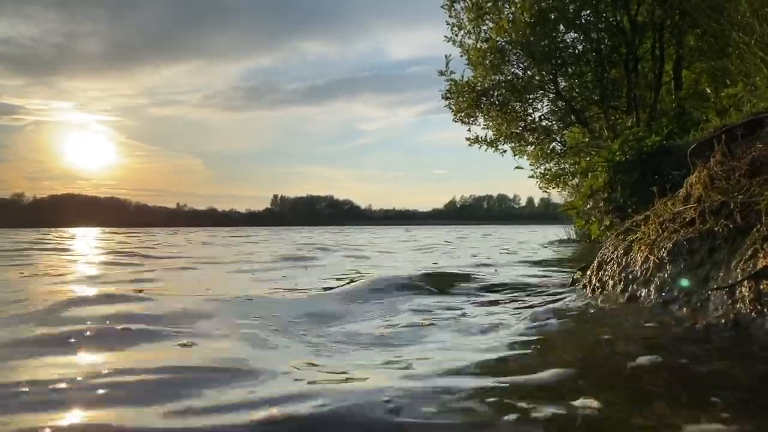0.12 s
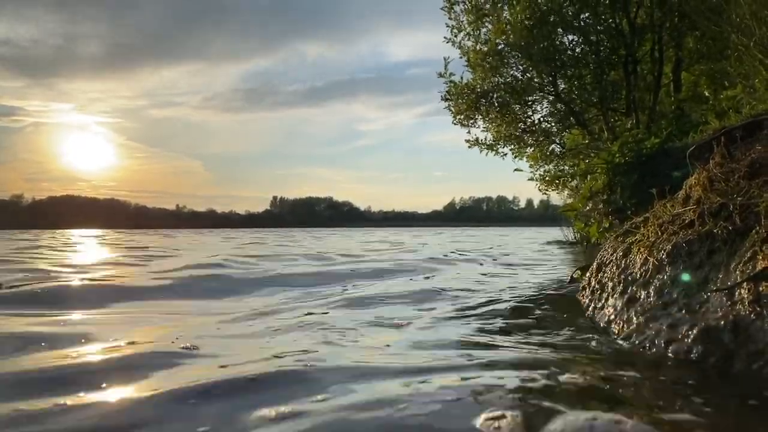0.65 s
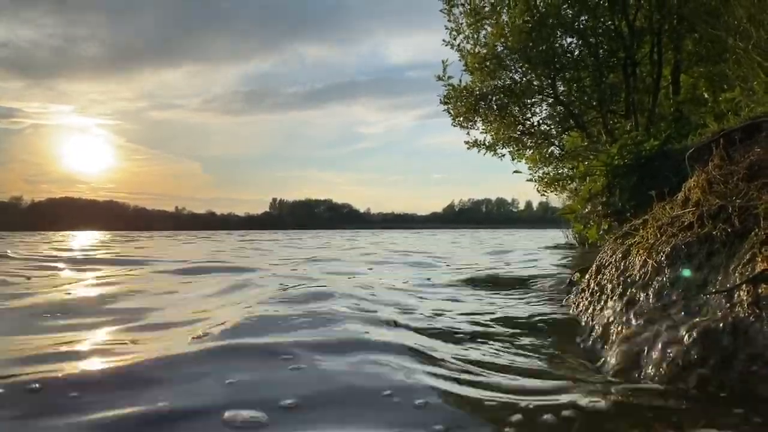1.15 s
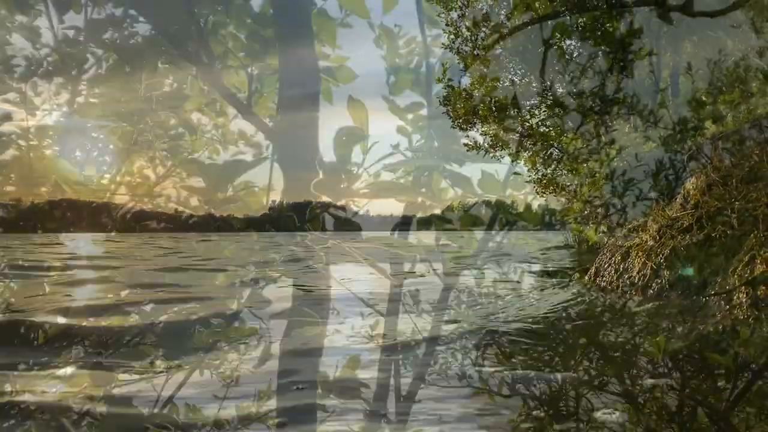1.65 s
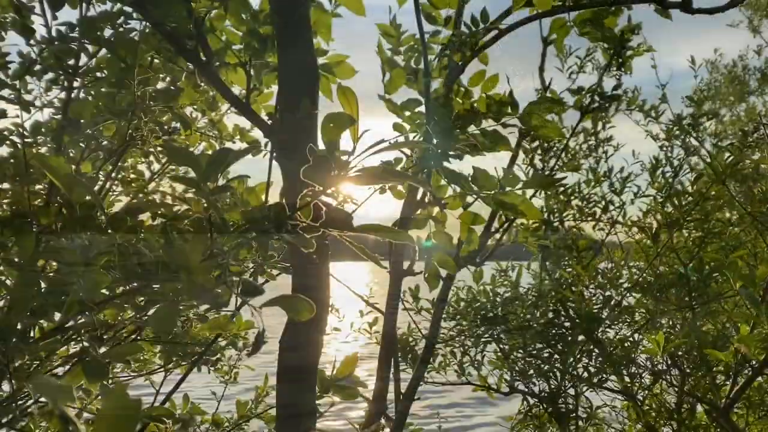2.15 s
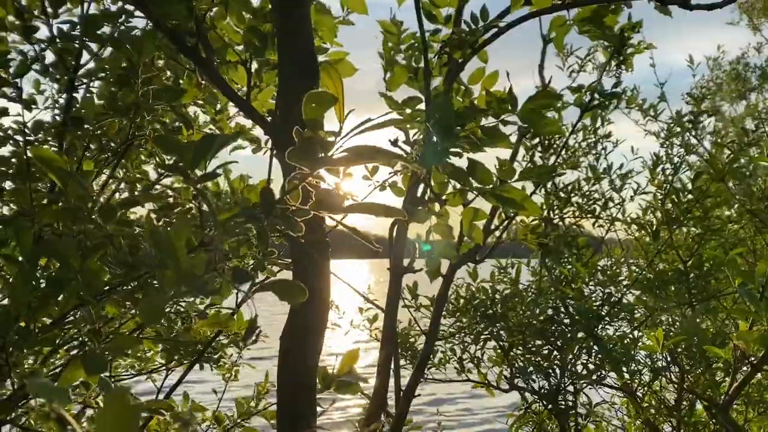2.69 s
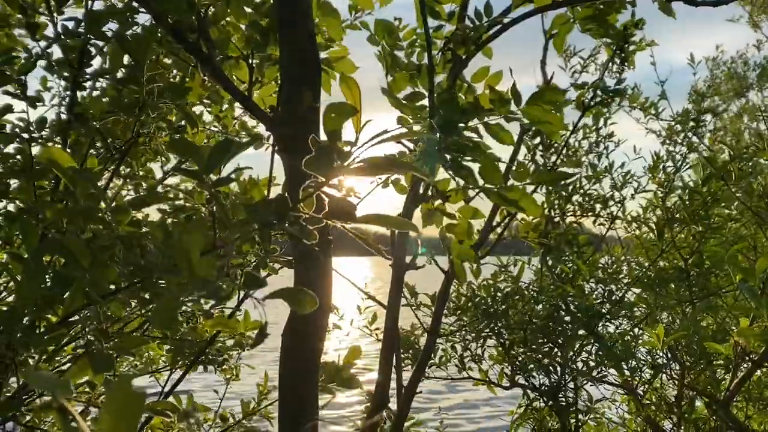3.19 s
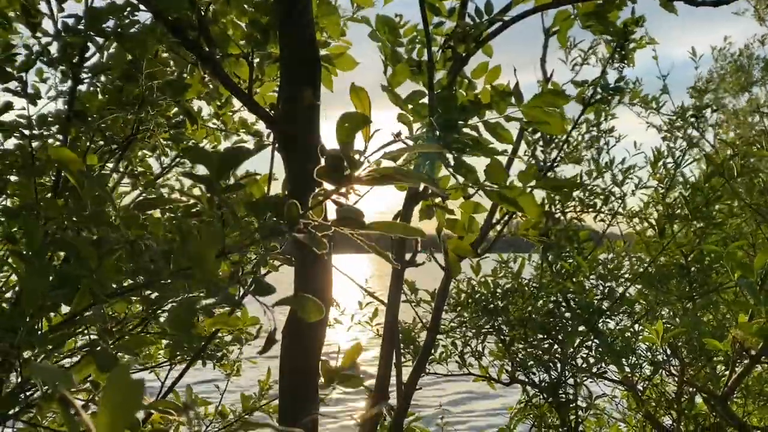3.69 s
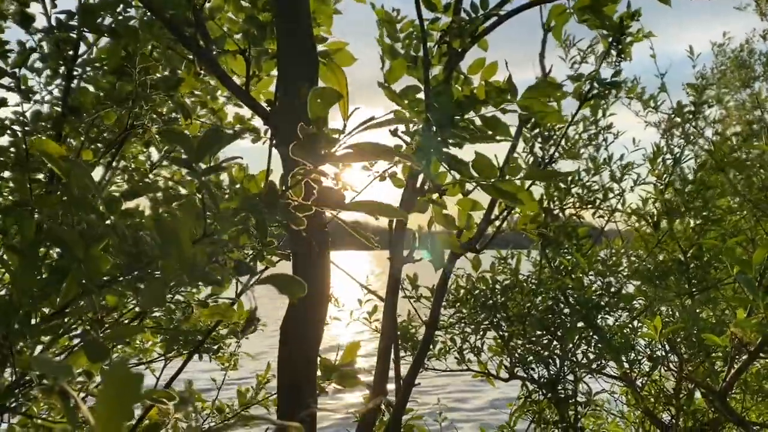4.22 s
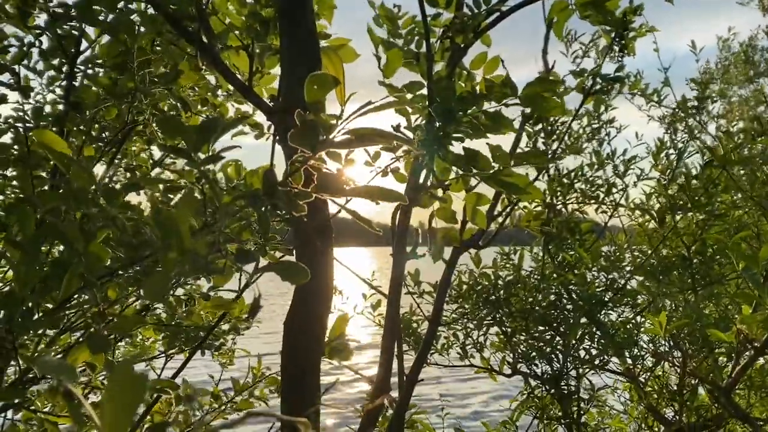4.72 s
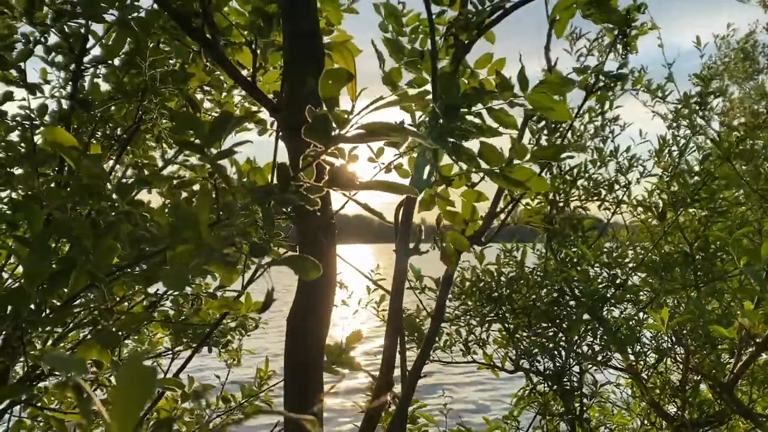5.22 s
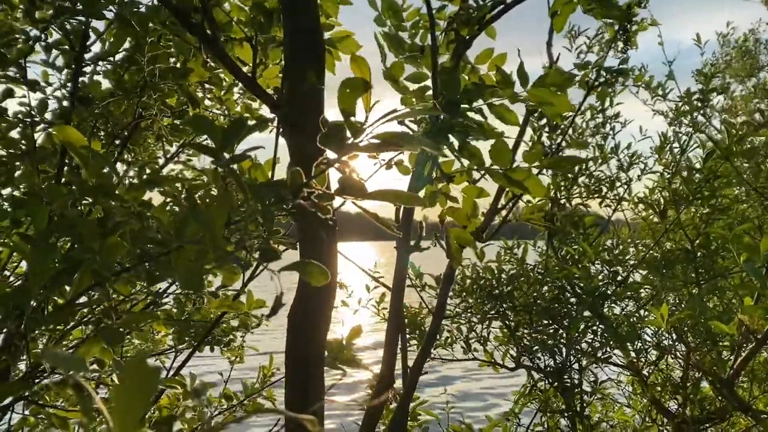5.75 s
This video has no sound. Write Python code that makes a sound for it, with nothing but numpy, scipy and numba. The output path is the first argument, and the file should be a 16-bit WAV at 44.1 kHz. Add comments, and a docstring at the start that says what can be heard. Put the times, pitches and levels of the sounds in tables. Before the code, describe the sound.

A stereo phone near the waterline catches wet slaps, bubbly gurgles and bright, snapping droplets for under two seconds, thinning to drips. Uneven wind rumble lies beneath. A smooth crossfade leads to hushed lakeside trees: low scooped whistles, a cluster of quick high chirps, then sparse distant chips, left of centre with slight woodland echo. Soft leaf hiss and isolated twig clicks remain.

```python
"""Small waves slap a muddy lake bank close to a two-port phone microphone: bubbles ring as damped
sines, while spray and foam crackle as swarms of much shorter ones.
The place then dissolves into a spot among trees above the water, where birds, as gliding sines with
a noise echo, whistle to the left and twigs tick. Shaped noise gives wind rumble, far roar and leaf hiss."""
import sys
import numpy as np
from scipy import signal
from scipy.fft import rfft, irfft, next_fast_len
from scipy.io import wavfile
from scipy.ndimage import uniform_filter1d
from numba import njit

SR = 44100
rng = np.random.default_rng(int(sys.argv[2]) if len(sys.argv) > 2 else 0)


def dump(signal):
    """Clip the signal to [-1, 1] and save it as 16-bit WAV at the path in sys.argv[1]."""
    limited = np.clip(np.atleast_2d(signal).T, -1, 1)
    pcm = np.round(limited * 32767).astype(np.int16)
    wavfile.write(sys.argv[1], SR, pcm)


def amplitude_ratio(level_db):
    """Convert a level in decibels to the matching linear amplitude (field) ratio."""
    exponent = np.asarray(level_db, float) / 20
    return 10 ** exponent


N = 258867

TRICKLE_DB, FOAM_ENDS_S = -68.5, 2.1  # water draining between the slaps; end of all foam


def over_hz(hz, table):
    """Interpolation on a logarithmic frequency axis, from a table of Hz and value."""
    f, v = np.transpose(table)
    return np.interp(np.log(hz + 1), np.log(f + 1), v)


def over_s(s, values):
    """Linear interpolation in time, one value a sample."""
    return np.interp(np.arange(N) / SR, s, values)


def walk(rate):
    """Low-passed random process: levels held 1 / rate s and slewed twice; spread near 1."""
    hold = int(SR / rate)
    held = np.repeat(rng.standard_normal(N // hold + 1), hold)
    return 1.047 * uniform_filter1d(uniform_filter1d(held, hold), hold)[:N]


def ears(pan_db):
    """Interaural level difference: left and right gains for left minus right dB."""
    return amplitude_ratio(np.array([pan_db, -pan_db]) / 2)


def resonate(x, hz, width_hz):
    """Two-pole resonance, gain 1 at the centre."""
    return signal.lfilter(*signal.iirpeak(hz, hz / width_hz, SR), x)


def band_hz(size):
    """Frequency in Hz of each bin of a real Fourier transform."""
    return np.arange(size // 2 + 1) * SR / size


def air(place, flicker_db):
    """Turbulent noise as rumble, roar and hiss, each of rms 1: gusts swell all bands, each flickers alone."""
    colour, _, alike, balance = place
    hiss_flicker_db = 1.2  # the hiss stays smoother than the rumble
    size = next_fast_len(N)
    hz = band_hz(size)
    likeness = np.clip(over_hz(hz, alike), -.96, .96)
    mid, side = rfft(rng.standard_normal((2, size)))
    pair = np.sqrt(1 + likeness) * mid + np.sqrt(1 - likeness) * side * np.array([[1], [-1]])
    pair = pair * ears(over_hz(hz, balance)) * amplitude_ratio(over_hz(hz, colour))
    layers, gust = np.zeros((3, 2, N)), walk(16)
    for centre in 2. ** np.arange(4, 15):  # octave bands, 16 Hz to 16 kHz
        share = np.cos(np.pi / 2 * np.clip(np.log2((hz + 1) / centre), -1, 1)) ** 2
        if centre < 400:
            swell_db = flicker_db * walk(10) + 2.2 * gust
        else:
            swell_db = hiss_flicker_db * walk(10) + .3 * gust
        layer = int(centre > 140) + int(centre > 400)
        layers[layer] += irfft(pair * share, size)[:, :N] * amplitude_ratio(swell_db)
    rms = np.sqrt(np.mean(layers.mean(axis=1) ** 2, axis=1))  # of the mean of left and right
    return layers / rms[:, None, None]


@njit
def rings(n, start, turn, decay, rise, left, right):
    """Damped free oscillation: sines whose pitch climbs as they die (rise: share per neper of decay)."""
    out = np.zeros((2, n))
    for k in range(len(start)):
        z, w = -1j, turn[k]
        for i in range(start[k], min(n, start[k] + int(7 / decay[k]))):
            z *= np.exp(1j * w - decay[k])
            w *= 1 + rise * decay[k]
            out[0, i] += left[k] * z.real
            out[1, i] += right[k] * z.real
    return out


def pops(rows, rise, crack_db):
    """Bubble resonance: each row rings at its pitch; the break of the surface adds a sharp crack."""
    s, db, hz, t60_ms, pan_db = np.transpose(rows)
    start = np.clip(s * SR, 0, N - 1).astype(np.int64)
    gains = amplitude_ratio(db) * ears(pan_db)
    turn = 2 * np.pi * hz / SR  # radians a sample
    decay = np.log(1000) * 1000 / (t60_ms * SR)  # nepers a sample
    out = rings(N, start, turn, decay, rise, *gains)
    crack = np.zeros((2, N))
    np.add.at(crack, (slice(None), start), gains * amplitude_ratio(crack_db))
    # a crack has no body
    crack = signal.sosfilt(signal.butter(2, 3000, "high", fs=SR, output="sos"), crack)
    return out + crack + resonate(crack, 10400, 2500)  # each crack rings the port resonance


def churn_db(t, trickle_db):
    """Energy growth and decay of foam: each slap swells, churns on and dies; between them the bank drains."""
    # Waves slapping the mud. Each row: time in seconds, foam level in dB, churning on in seconds.
    slap_rows = [(0.154, -44, 0.0097), (.262, -60.5, 0.011), (.39, -63, 0.012), (.55, -56.5, 0.097),
                 (.712, -53.5, 0.01), (.78, -49.5, 0.085), (1.525, -58.5, 0.033), (1.84, -68, 0.033)]
    rise_db_per_s, fall_db_per_s = 302.5, 280
    trickle_ends_s = 1.35
    s, db, hold = np.transpose(slap_rows)[:, :, None]
    before, after = np.maximum(s - t, 0), np.maximum(t - s - hold, 0)
    slaps = db - rise_db_per_s * before - fall_db_per_s * after
    trickle = trickle_db - 40 * np.clip((t - trickle_ends_s) / 0.053, 0, .3)  # sinks by 12 dB
    return np.maximum(slaps.max(axis=0), trickle)


def foam(count=2400):
    """Random superposition of tiny bubbles, a few much louder than the rest, following the churning."""
    when, pitch, size, ring, side = rng.random((count, 5)).T
    s, hz = when * FOAM_ENDS_S, 1100 * (12000 / 1100) ** pitch
    db = churn_db(s, TRICKLE_DB) + 3 - 4.4 * np.log(size + .015) - 1.882 * np.log2(hz / 2000)
    cycles = 4 + 18 * ring ** 2 * (1 - pitch)  # the larger ones plop, the smallest only tick
    return pops(np.transpose([s, db, hz, 1000 * cycles / hz, 9 * (side - .5)]), 0.031, -16.5)


def gurgle(count=700):
    """Resonance of larger bubbles, which ring longer and climb in pitch as they near the surface."""
    when, pitch, size, ring, side = rng.random((count, 5)).T
    s, hz = when * FOAM_ENDS_S, 800 * 4.5 ** pitch
    db = churn_db(s, TRICKLE_DB - 4) - 3 * np.log(size + 0.0299)
    cycles = 10 + 25 * ring
    return pops(np.transpose([s, db, hz, 1000 * cycles / hz, 12 * (side - .5)]), 0.073, -19.5)


def spray(count=9):
    """Clustered impulses: each burst is droplets scattered in time and pitch, loudest in the middle."""
    # The clearest bursts. Each row: time in seconds, level in dB ahead of the scatter in level,
    # middle pitch in Hz, left minus right in dB.
    bursts = [(.0192, -32, 4320, 0), (.1, -37.5, 7600, 1.3), (.112, -37, 8460, 8), (.13, -33.5, 10930, -1),
              (.1346, -26, 3750, -4), (.1566, -29, 5600, 1), (.1656, -38, 5550, 13), (.221, -34, 3500, -3),
              (.2564, -27, 10500, -2), (.2653, -32, 5740, 11), (.3209, -39, 6180, 9.5),
              (.376, -49, 2900, 7), (.3963, -35, 4360, 7), (.423, -60, 4700, 5), (.437, -60, 3100, 5),
              (.5502, -38, 4180, 13), (.574, -30.5, 11600, -1), (.5934, -44, 8650, 7),
              (.635, -31.5, 4350, 1), (.6858, -41, 3720, 7), (.6976, -62, 5800, 6), (.7151, -22, 11500, 0),
              (.7264, -28, 11800, 1), (.7722, -35, 7850, 6), (.79, -30, 4380, -4), (.7955, -4, 10400, 0),
              (.8284, -30, 10590, 4), (.8522, -31.5, 4180, 3), (.8564, -30.5, 6600, -5),
              (.884, -39, 4120, 4), (.958, -37.5, 5240, 17), (1.0352, -50, 6320, -4),
              (1.0537, -46.5, 6770, 12), (1.0728, -39.5, 5010, 6), (1.154, -50, 11050, -2.5),
              (1.4193, -49, 11900, 0), (1.5158, -44, 4690, 6), (1.5284, -36.5, 8400, -11.5),
              (1.5315, -24.5, 10060, 3), (1.5705, -39, 9340, 1), (1.6396, -48, 10340, -3),
              (1.717, -36.5, 13850, 2.5), (1.8156, -49.5, 9690, -7), (1.8251, -47.5, 8350, 6.5),
              (1.8804, -44.5, 9370, 1)]
    s, db, hz, pan_db = np.repeat(bursts, count, axis=0).T
    early, detune, size = rng.standard_normal((len(s), 3)).T
    early[::count], detune[::count], size[::count] = 0, 0, 2  # the main droplet of each burst
    spread_s = .21 * (55 / hz + 0.0047)  # scatter in time: about 11.5 cycles of the pitch plus about 1 ms
    hz = np.clip(hz * 1.33 ** detune, 1800, 14000)
    db = db - 9.5 + 3 * size - 4 * abs(early) - 4 * np.maximum(early, 0) + 4.3 * np.log2(hz / 5000)
    return pops(np.transpose([s + early * spread_s, db, hz, 46000 / hz, pan_db]), 0, -15)


def bubbles():
    """Free resonance of single bubbles at the bank, their pitch climbing only slightly."""
    # The clearest bubbles. Each row: time in seconds, level in dB, pitch in Hz,
    # ring t60 in milliseconds, left minus right in dB.
    bubble_rows = [(.0503, -37.5, 710, 14, -9.5), (.1001, -45, 2194, 23, 2), (.1343, -30, 1800, 6.6, -11),
                   (.1433, -40, 2000, 14, 3), (.1544, -45, 1130, 14, -8), (.1605, -39, 1080, 7.6, -9.5),
                   (.1659, -20.5, 1056, 28, -12), (.193, -48, 1810, 22, -5), (.2048, -50, 1750, 18, -3),
                   (.2205, -32, 2600, 20, -3), (.2234, -29, 1030, 17, -4), (.2262, -26, 793, 70, -7),
                   (.262, -41.5, 1250, 18, -6), (.518, -32.5, 1060, 24, 2.5), (.828, -30.5, 1180, 12, 2),
                   (.2644, -35, 3830, 12, -5), (.3926, -32.5, 885, 40, 5.5), (.4695, -49.5, 1670, 17, 13),
                   (.5176, -36.5, 1760, 13, 5), (.5502, -34, 3150, 12, 8), (.5724, -40.5, 1420, 29, 16.5),
                   (.6032, -35.5, 1840, 13, -9), (.6259, -32, 1600, 15, 12), (.698, -25.5, 950, 17, 9.5),
                   (.7136, -29, 1400, 25, -6.5), (.7136, -30.5, 2030, 15, -4.5), (.717, -33, 3400, 18, 7),
                   (.7238, -36, 2540, 11, 1), (.7587, -37, 2470, 13, 0), (.7683, -31.5, 3020, 14, -3),
                   (.7675, -31.5, 1810, 11, -4.5), (.7944, -25.5, 1650, 9, -0.9),
                   (.803, -32, 1000, 28, -12.5), (.789, -33.5, 1750, 9, -1), (.851, -35.5, 2580, 12, -2),
                   (.8428, -31.5, 1940, 8, -2), (.8508, -30.5, 1760, 14, -2.5),
                   (.8626, -32.5, 1097, 15, -9), (.8841, -39, 1080, 13, -5), (.8959, -35, 836, 15, -4.5),
                   (.9581, -41, 3290, 16, -9), (1.1348, -52.5, 1310, 30, 14), (1.1921, -46.5, 1270, 21, -8),
                   (1.177, -52.5, 1960, 15, 0), (1.226, -50, 1320, 35, 5), (1.243, -55.5, 1880, 20, -8),
                   (1.571, -35.5, 1367, 16, -8.5), (1.5106, -54, 1000, 15, 5.5), (1.5165, -46, 2590, 14, 8),
                   (1.5712, -41.5, 2870, 18, -7)]
    return pops(bubble_rows, 0.01198, -0.98)


def fizz(count=900):
    """Random impulse train: many tiny bright bubbles burst as the film drains."""
    # Course of the crackle: times in seconds, and base levels in dB at those times.
    fizz_s = (.1, .5, .9, 1.35, 1.4)
    fizz_db = (-63, -60.5, -58, -70.5, -89)
    when, pitch, size, side = rng.random((count, 4)).T
    s, hz = fizz_s[0] + when * (fizz_s[-1] - fizz_s[0]), 2500 * 3.4 ** pitch
    db = np.interp(s, fizz_s, fizz_db) - 4 * np.log(size + 0.018)
    return pops(np.transpose([s, db, hz, 9000 / hz, 10 * (side - .5)]), 0.031, -3.5)


def drips():
    """Short damped resonances: single droplets draining off the mud tick for 23 cycles each."""
    # Each row: time in seconds, level in dB, pitch in Hz, left minus right in dB.
    drip_rows = [(0.5248, -41, 3500, 11.0), (0.582, -39, 5050, 3.0), (0.7364, -45, 5470, 2),
                 (0.9158, -45, 4500, 7), (0.935, -48, 3910, -4), (0.9436, -38, 3940, -1),
                 (0.9691, -40, 3800, 1), (1.054, -62, 4000, 5), (1.0726, -49, 3980, 4),
                 (1.1535, -55, 4000, 3), (0.9944, -58, 3430, 4), (1.0055, -47.5, 7100, 6.0),
                 (1.0227, -57, 6080, 1), (1.0959, -54, 3520, 3.0), (1.1814, -57, 3360, 5.0),
                 (1.1954, -59, 3510, 5.5), (1.2183, -51, 4950, 10), (1.2356, -54.5, 5000, 8),
                 (1.275, -48, 3330, 0), (1.2922, -52, 4940, 3), (1.3084, -57, 3230, 3.5),
                 (1.3245, -47, 3410, 1.5), (1.333, -51, 3650, 4.0), (1.391, -66, 6500, 1.5),
                 (1.4711, -60, 5700, 4.0), (1.5007, -50, 3240, 2), (1.5527, -45, 4350, 6),
                 (1.7584, -60.5, 3640, 6.0), (1.8512, -53, 3350, 2), (1.916, -56, 5900, 9)]
    s, db, hz, pan_db = np.transpose(drip_rows)
    return pops(np.transpose([s, db, hz, 1000 * 23 / hz, pan_db]), 0.037, 0)


def climbers():
    """Resonance rising near a free surface: bubbles that rise while they ring."""
    # Each row: time in seconds, level in dB, starting pitch in Hz, ring t60 in milliseconds,
    # left minus right in dB.
    climber_rows = [(.6417, -36, 1320, 44, -7), (.6515, -37.5, 1720, 25, -6), (.7975, -35, 2870, 20, -0.5),
                    (.8045, -36, 2287, 22.6, -1), (.8125, -30, 1755, 34, -6),
                    (.8287, -33.5, 2147, 30, -4.5)]
    return pops(climber_rows, .08, -13)


def water():
    """Phase difference between two ports: all water sounds reach the left one turned by frequency."""
    # Sounds from the bank side. Each row: frequency in Hz, phase lead of the left port in radians.
    port_lead = [(0, 0), (340, 0), (750, 3), (1100, 3.4), (1450, 4.2), (1810, 6), (3270, 7.3), (5170, 7.3),
                 (7150, 5.9), (8010, 3.3), (16400, -6.8)]
    wet = bubbles() + spray() + foam() + gurgle() + climbers() + drips() + fizz()
    # small bubbles give no bass, the ports dull the top
    wet = signal.sosfilt(signal.butter(2, (480, 12500), "band", fs=SR, output="sos"), wet)
    size = next_fast_len(N)
    f, lead = np.transpose(port_lead)
    turn = np.exp(1j * np.interp(band_hz(size), f, lead))
    return np.array([irfft(rfft(wet[0], size) * turn, size)[:N], wet[1]])


def near_notes():
    """Frequency-modulated whistles: a near bird's phrase and low scooped notes, as curves of s, Hz, dB."""
    # Two breaths of the near bird, a fainter bird's arch above, and the near bird's first low note.
    # Each row of a note: time in seconds, pitch in Hz, level in dB.
    phrase = [
        [(1.66, 2930, -79), (1.688, 2850, -68), (1.701, 2373, -59), (1.75, 2387, -57), (1.785, 2420, -62),
         (1.803, 2566, -59.5), (1.83, 2046, -56), (1.87, 1966, -56), (1.89, 1950, -61)],
        [(1.893, 2484, -63), (1.92, 2416, -57.5), (2.005, 2378, -71), (2.03, 2417, -90), (2.12, 2380, -85)],
        [(1.685, 3200, -85), (1.72, 3520, -81), (1.78, 3580, -81), (1.82, 3080, -76)],
        [(2.203, 1390, -69), (2.218, 1574, -66), (2.235, 1628, -56.5), (2.26, 1583, -62), (2.288, 1313, -67)],
    ]
    # Low scooped notes. Each row: start in seconds, length in seconds, top pitch in Hz, level in dB.
    scoops = [(2.376, 0.083, 1480, -61.5), (2.545, 0.078, 1471, -60.5), (2.721, 0.09, 1433, -59),
              (2.928, 0.078, 1448, -59.5)]
    # Fade of a scoop: level against its top in dB at the start, halfway up and at the end.
    scoop_fade_db = (-12.5, -2.5, -10)
    start_share, end_share, top_at = .87, 0.93, 0.72  # pitch as shares of the top; top as share of length
    start_db, half_db, end_db = scoop_fade_db
    notes = [np.transpose(note) for note in phrase]
    for s, length, hz, db in scoops:
        times = s + length * np.array([0, top_at / 2, top_at, 1])
        pitches = hz * np.array([start_share, (1 + start_share) / 2, 1, end_share])
        notes.append((times, pitches, db + np.array([start_db, half_db, 0, end_db])))
    return notes


def chorus(count=160):
    """Random superposition of faint notes of many birds far off, thinning out with time; rows as chips()."""
    s, length, pitch, slope, size = rng.random((count, 5)).T
    hz, glide = 1800 * 2.3 ** pitch, .1 * (slope - .6)
    start_s, length_s = 2 + 3.8 * s ** 1.5, 0.014 + 0.0513 * length
    db = -86 + 6 * size - 1.7 * s
    return np.transpose([start_s, length_s, hz * (1 - glide), hz * (1 + glide), db])


def chips():
    """Repeated upward glide of a far bird, in rows of start s, length s, first Hz, last Hz, level dB."""
    # Each row: start in seconds, level in dB.
    chip_rows = [(4.09, -80), (4.243, -79), (4.39, -81), (4.555, -75), (4.725, -78), (4.895, -74),
                 (5.07, -73)]
    return [(s, .032, 4260, 4840, db) for s, db in chip_rows]


def birds():
    """Near-pure tones with slight frequency and amplitude modulation, and their echo among the trunks."""
    # Farther birds, one glide each. Each row: start in seconds, length in seconds, first pitch in Hz,
    # last pitch in Hz, level in dB.
    chirps = [(.03, 0.11, 3070, 2970, -68.5), (.93, 0.068, 2610, 2580, -71), (1.166, 0.01, 3450, 3440, -72),
              (1.246, 0.014, 3290, 3370, -65), (1.271, 0.012, 3380, 3306, -67),
              (1.372, 0.076, 1790, 2070, -76), (1.441, 0.067, 1970, 1880, -71),
              (1.94, 0.041, 4000, 3600, -82), (3.6, 0.083, 2480, 2450, -78), (3.44, .05, 2940, 2830, -78),
              (2.96, 0.084, 2200, 1950, -72.5), (3.0, 0.1, 1870, 1840, -74),
              (3.08, 0.14, 1790, 1740, -70.5), (2.83, 0.11, 1830, 1860, -77.5),
              (2.945, 0.022, 5330, 5160, -78.5), (3.05, 0.023, 5400, 4400, -74),
              (3.148, 0.135, 5050, 4700, -66), (3.152, 0.07, 7780, 7680, -75),
              (3.225, .13, 7660, 7450, -70), (3.45, .08, 7000, 7060, -86.5),
              (3.274, 0.025, 4800, 4700, -62.5), (3.288, 0.013, 4500, 4000, -57.5),
              (3, .008, 3750, 2400, -67.5), (3.308, .012, 3120, 3147, -61),
              (3.3015, 0.0075, 4170, 4280, -62), (3.299, .031, 4760, 4740, -70),
              (3.314, 0.0146, 2800, 1677, -65), (3.331, 0.012, 3000, 3260, -64),
              (3.342, .012, 3080, 2598, -71), (3.412, 0.027, 1770, 2100, -68),
              (2.47, 0.094, 4700, 4320, -82), (2.54, .04, 3400, 3170, -76), (2.575, 0.071, 3170, 3400, -80),
              (2.9, 0.061, 3470, 3400, -77), (5.785, .04, 4480, 4300, -79),
              (3.366, 0.031, 2030, 2200, -70.5), (2.68, 0.01, 4700, 3470, -69.5),
              (2.78, .045, 2940, 2730, -75.5), (2.715, 0.021, 2410, 2530, -69.5),
              (3.22, 0.096, 3600, 3500, -76), (3.521, 0.027, 4560, 4430, -68),
              (3.58, 0.06, 3280, 2950, -74), (3.627, 0.033, 4540, 4500, -64),
              (3.632, 0.035, 5020, 4830, -73), (3.3, 0.058, 6360, 6000, -77),
              (3.776, 0.045, 4530, 4350, -68), (3.781, 0.08, 6350, 6420, -83), (3.95, .08, 3250, 3030, -79),
              (4.621, 0.05, 3230, 3070, -79), (4.77, 0.093, 3500, 3320, -81), (4.85, .03, 3400, 3000, -79),
              (5.73, 0.12, 5030, 4880, -76.5)]
    out = np.zeros(N)
    notes = near_notes()
    near = len(notes)
    flutter_db = 3 * walk(220)  # far notes arrive broken up by the leaves
    for s, length, first_hz, last_hz, db in [*chirps, *chips(), *chorus()]:
        u = np.linspace(0, 1, 9)
        fade_db = 13 * np.log10(np.sin(np.pi * u ** 0.59) + 0.047)
        notes.append((s + length * u, first_hz + (last_hz - first_hz) * u, db + fade_db))
    waver, tremble = amplitude_ratio(2.4 * walk(110)), 1 + 0.006 * walk(150)  # of amplitude and of pitch
    for k, (s, hz, db) in enumerate(notes):
        i = np.arange(int(s[0] * SR), int(s[-1] * SR))
        hz, db = (np.interp(i / SR, s, curve) for curve in (hz, db))
        edge = np.minimum(1, np.minimum(i - i[0], i[-1] - i) / (0.0025 * SR))  # 2.5 ms ramps
        loudness = np.sqrt(2) * amplitude_ratio(db + (k >= near) * flutter_db[i]) * edge * waver[i]
        out[i] += loudness * np.sin(2 * np.pi * np.cumsum(hz * tremble[i]) / SR)
    t = np.arange(int(.3 * SR)) / SR
    tail = amplitude_ratio(-34.5) * rng.standard_normal((2, len(t))) * np.exp(-t / 0.058)
    return ears(9.2)[:, None] * out + signal.fftconvolve(out[None], tail, axes=1)[:, :N]


def twigs():
    """Impulse excitation: dry ticks among the branches, each trailed by a short decaying bright rustle."""
    # Each row: time in seconds, level in dB, pitch in Hz, ring t60 in milliseconds,
    # left minus right in dB.
    twig_rows = [(4.3825, -43.5, 10360, 2.2, 2), (4.3835, -53.5, 904, 9.5, 11), (4.5197, -50, 3825, 1.5, 9),
                 (5.445, -61, 5920, 3.5, 5), (3.073, -54, 2100, 6, 9), (3.7105, -59.5, 1036, 8.9, 15.5)]
    ticks = pops(twig_rows, 0, -9)
    t = np.arange(int(.08 * SR)) / SR
    rustle = amplitude_ratio(-16.5) * rng.standard_normal((2, len(t))) * np.exp(-t / 0.0099)
    return ticks + signal.fftconvolve(ticks, rustle, axes=1)[:, :N]


def scene():
    """Equal-power crossfade from the air of the bank to that of the trees, under water, birds and twigs."""
    # Course of the air. Each row: time in seconds, wind rumble in dB, far roar in dB.
    air_levels = [(0.0, -48, -56.5), (0.21, -52.5, -58.5), (0.24, -45, -71), (0.28, -57, -60),
                  (0.33, -37.5, -59.5), (0.39, -46.5, -54), (0.47, -35, -51), (0.58, -43.5, -61),
                  (0.67, -49.5, -55.5), (1.54, -48.5, -50.5), (1.78, -55.5, -54), (2.26, -57.5, -63.5),
                  (2.46, -48.5, -63), (2.629, -54, -64.5), (2.76, -50, -62.5), (2.86, -55.5, -62.5),
                  (3.4, -53.5, -67), (3.66, -62, -67), (4.56, -52.5, -66), (4.8, -51.5, -65.5),
                  (5.12, -53, -63), (5.18, -61, -72), (5.26, -53, -64), (5.87, -57, -63)]
    # Steady air of each place, in four parts: rows of frequency in Hz and colour in dB per Hz (shape only);
    # hiss level in dB; rows of Hz and left-right likeness (-1 to 1 once clipped);
    # rows of Hz and left minus right in dB.
    bank = [(15, -40.5), (25, -11.5), (65, 5.5), (238, -10), (617, -23.5), (2210, -35), (2900, -40.5),
            (3410, -41.5), (5500, -47.5), (8140, -46.5), (10400, -46), (13600, -64), (15200, -64),
            (16500, -74)], -65.5, [(60, 1.75), (130, 1.45), (290, 0.8), (640, 0.16), (1410, 0),
            (3100, -0.64), (6820, -0.7), (15000, 0.5)], [(60, -3.5), (110, 2.5), (200, -2), (380, -3.5),
            (700, -2.5), (1290, 1.5), (2380, 0), (4400, 3.5), (8120, 2), (15000, -8)]
    woods = [(15, -42), (25, -6.5), (53, 3.5), (76, 1), (172, -12.5), (410, -14), (979, -27.5), (5130, -37),
             (7510, -41), (8370, -46), (9580, -38.5), (10700, -37.5), (11900, -40.5), (12900, -60),
             (16500, -60)], -65, [(60, 1), (130, 1), (290, 0.88), (640, 0.15), (1410, 0.28), (3100, 0.12),
             (6820, 0.019), (15000, 0.49)], [(60, -1.5), (110, 5), (200, -0.5), (380, 2), (700, 8),
             (1290, 6.5), (2380, 6), (4400, 12), (8120, 4.5), (15000, -6)]
    s, rumble_db, roar_db = np.transpose(air_levels)
    trees = over_s((1.58, 2.4), (0, 1))  # the dissolve, in seconds
    bank_air = air(bank, 2.4) * np.sqrt(1 - trees)
    tree_air = air(woods, 2.2) * np.sqrt(trees)
    rumble, roar, _ = bank_air + tree_air
    hiss = amplitude_ratio(bank[1]) * bank_air[2] + amplitude_ratio(woods[1]) * tree_air[2]
    low = amplitude_ratio(over_s(s, rumble_db)) * rumble + amplitude_ratio(over_s(s, roar_db)) * roar
    return low + hiss + water() + birds() + twigs()


def top_cut(x):
    """Nothing passes above the cut-off."""
    return signal.sosfilt(signal.butter(12, 16830, fs=SR, output="sos"), x)


def record(dry):
    """Band limiting: the phone cuts the deepest bass and the top."""
    dry = signal.sosfilt(signal.butter(2, 34, "high", fs=SR, output="sos"), dry)
    mix = signal.sosfilt(signal.ellip(8, .2, 60, 16500, fs=SR, output="sos"), dry)
    return top_cut(mix)


dry = scene()
out = record(dry)
dump(out)
```